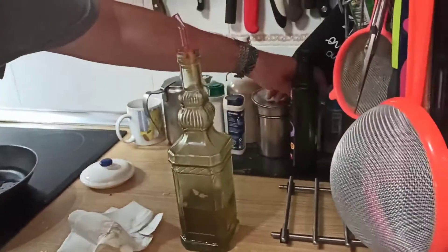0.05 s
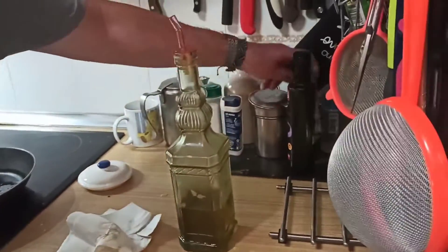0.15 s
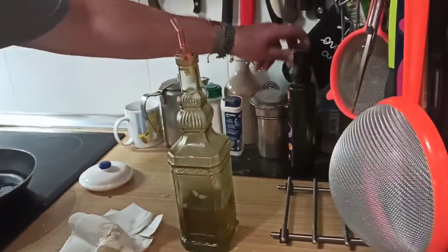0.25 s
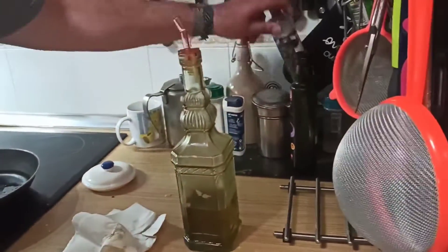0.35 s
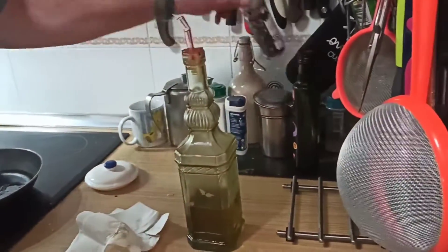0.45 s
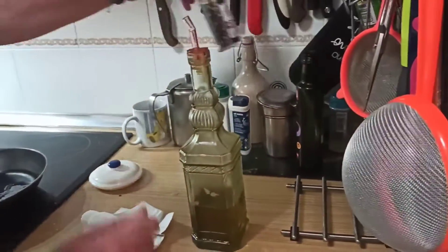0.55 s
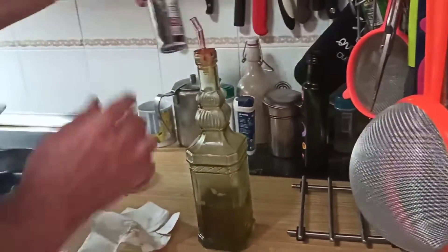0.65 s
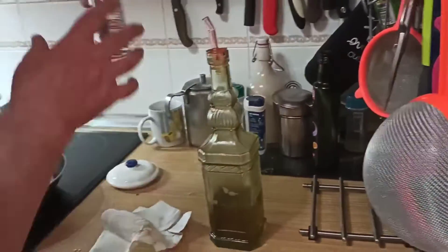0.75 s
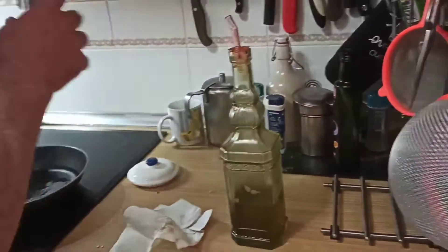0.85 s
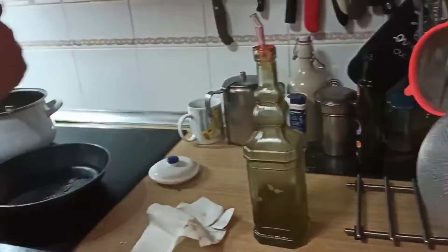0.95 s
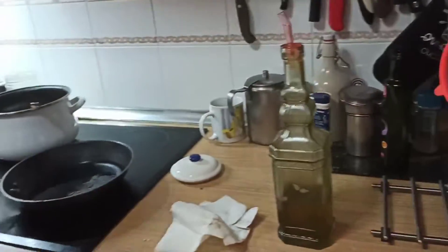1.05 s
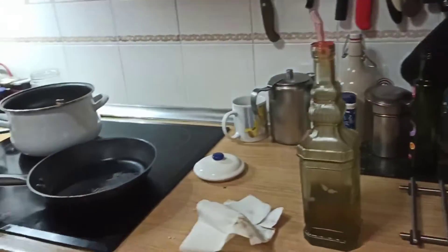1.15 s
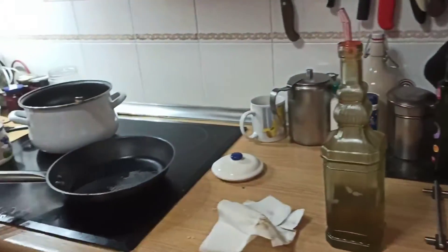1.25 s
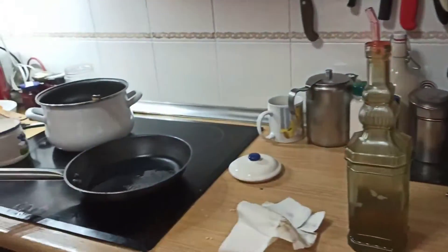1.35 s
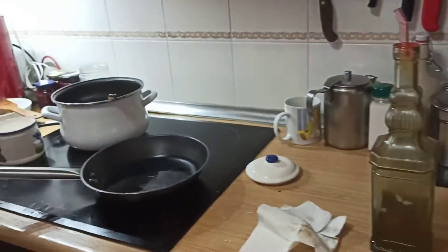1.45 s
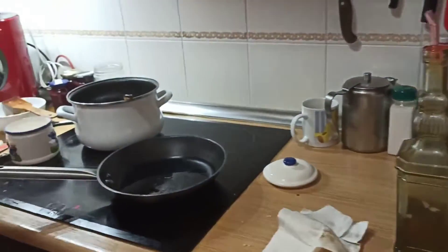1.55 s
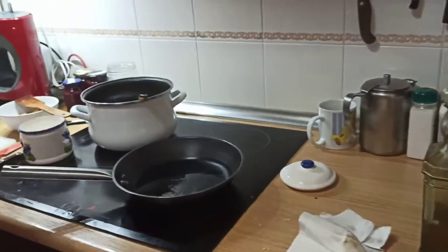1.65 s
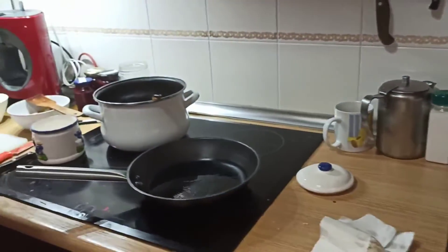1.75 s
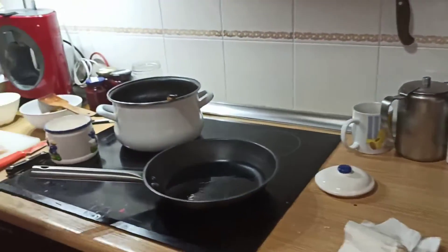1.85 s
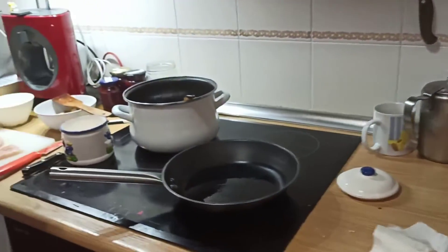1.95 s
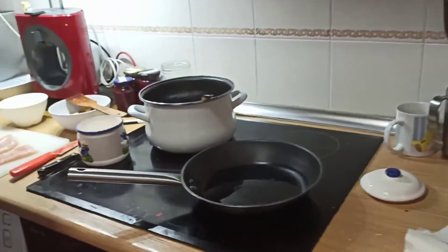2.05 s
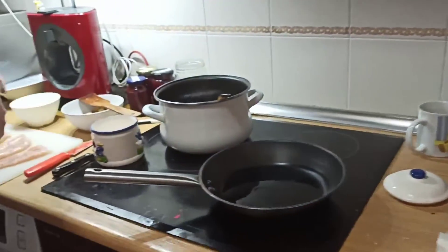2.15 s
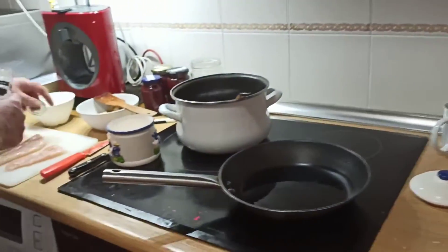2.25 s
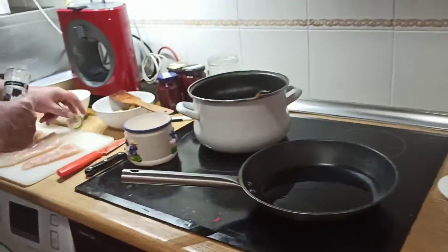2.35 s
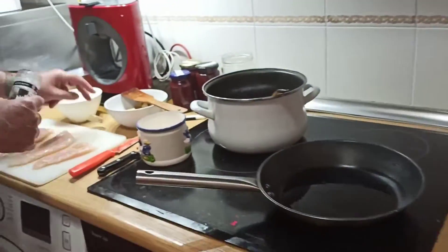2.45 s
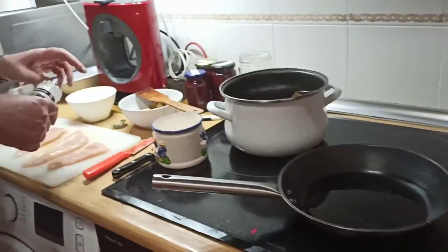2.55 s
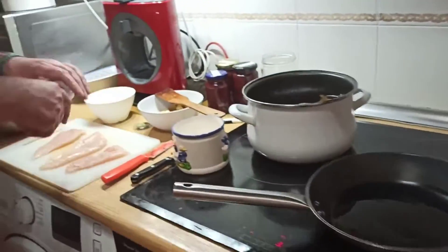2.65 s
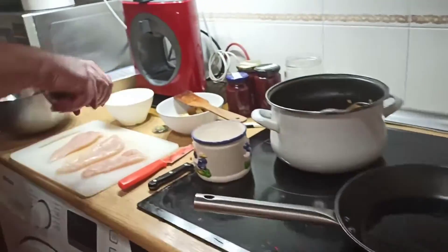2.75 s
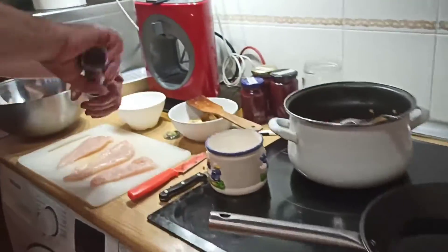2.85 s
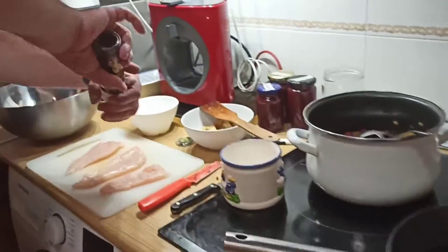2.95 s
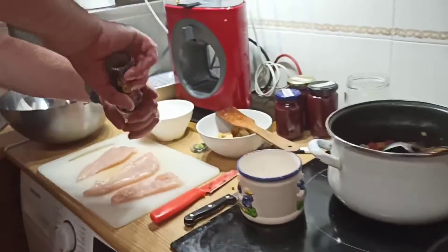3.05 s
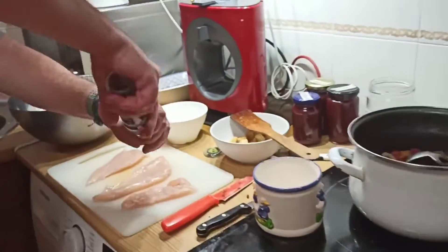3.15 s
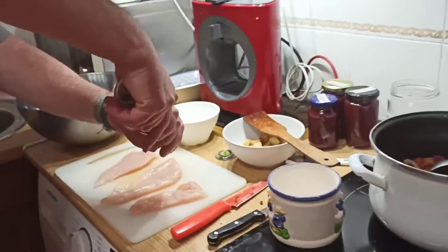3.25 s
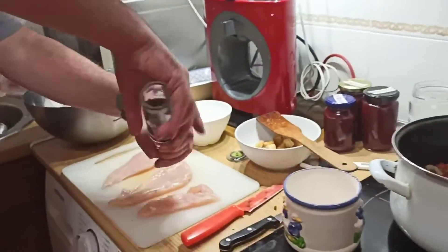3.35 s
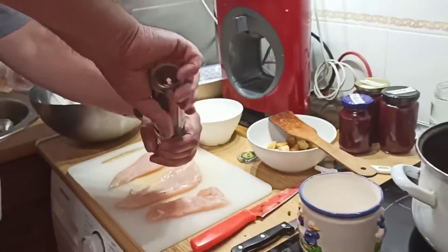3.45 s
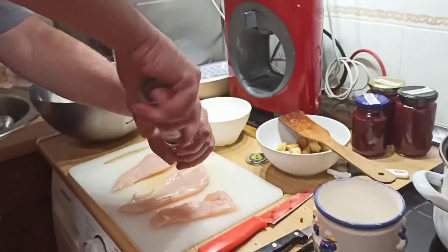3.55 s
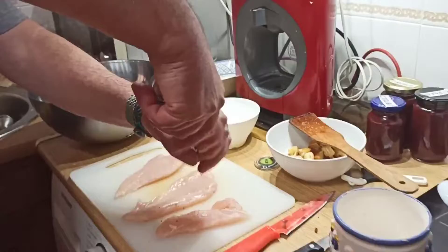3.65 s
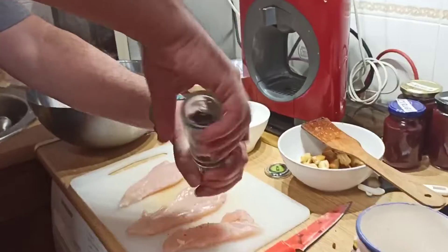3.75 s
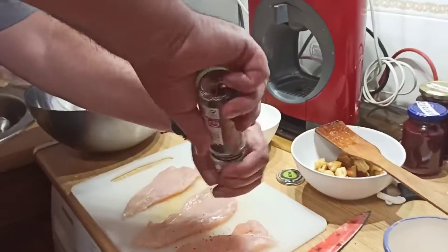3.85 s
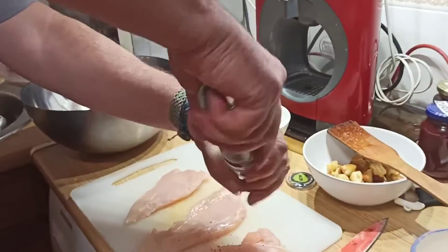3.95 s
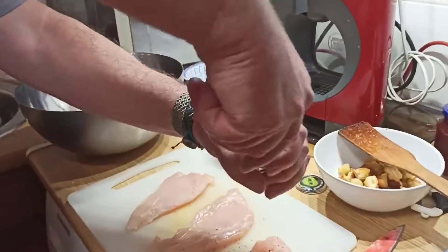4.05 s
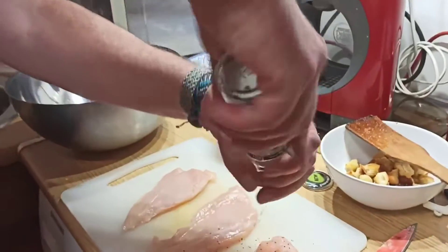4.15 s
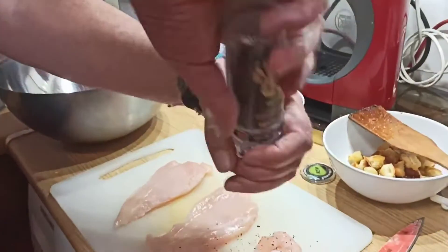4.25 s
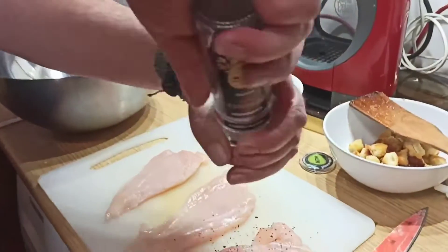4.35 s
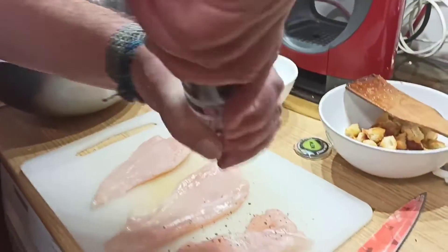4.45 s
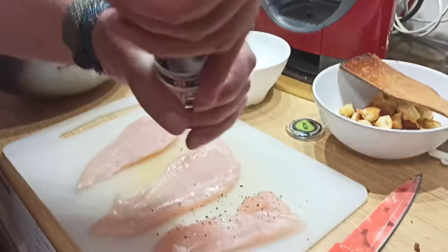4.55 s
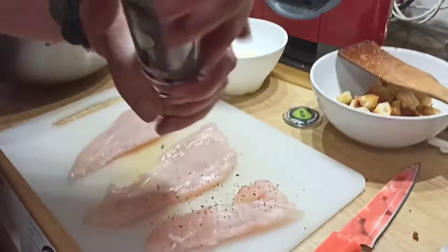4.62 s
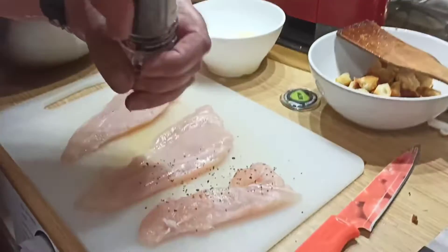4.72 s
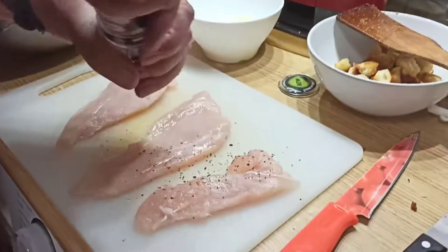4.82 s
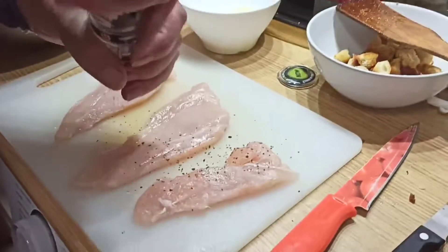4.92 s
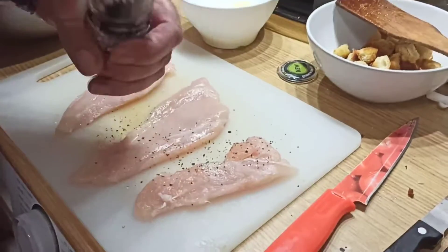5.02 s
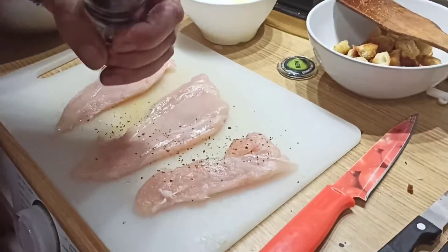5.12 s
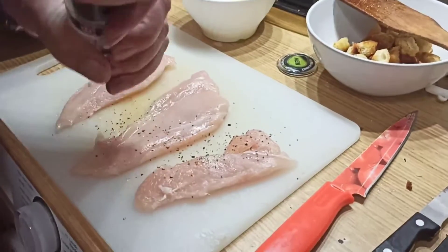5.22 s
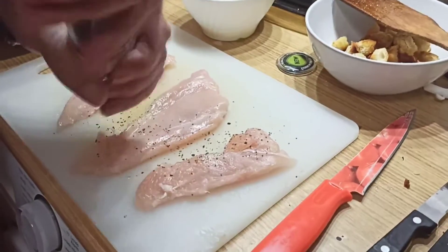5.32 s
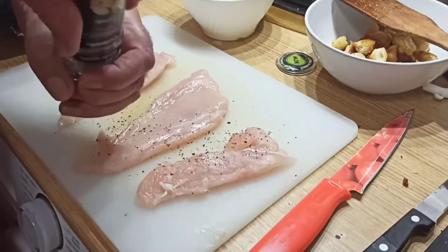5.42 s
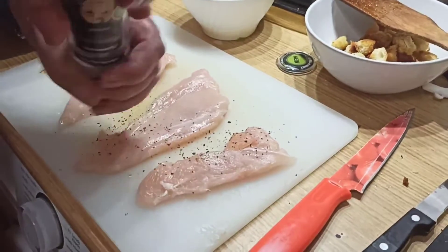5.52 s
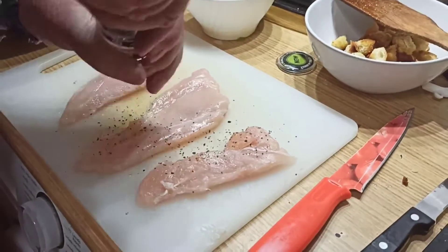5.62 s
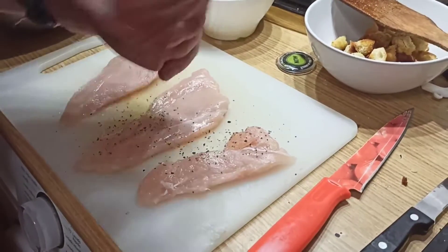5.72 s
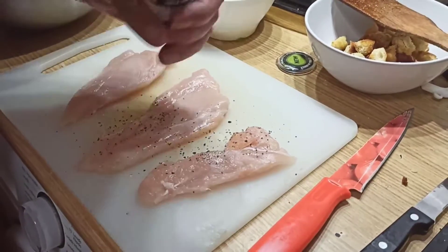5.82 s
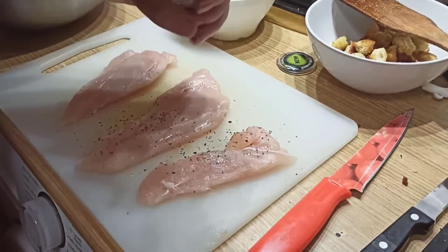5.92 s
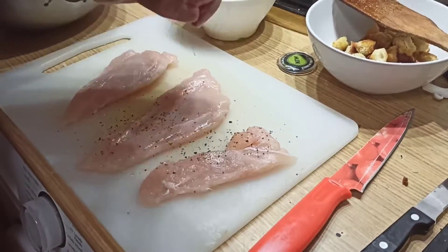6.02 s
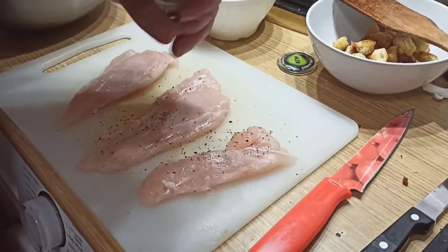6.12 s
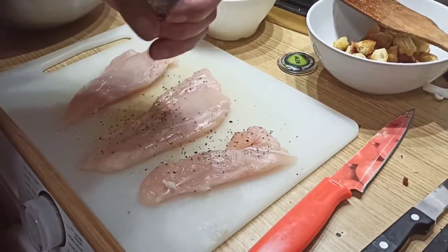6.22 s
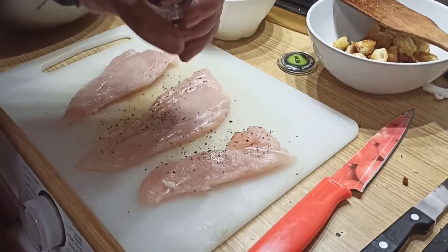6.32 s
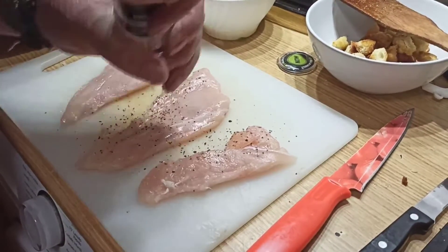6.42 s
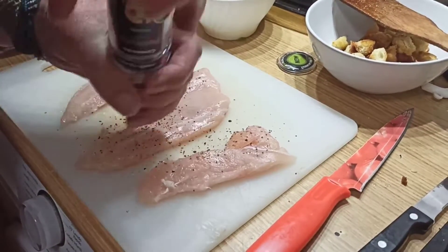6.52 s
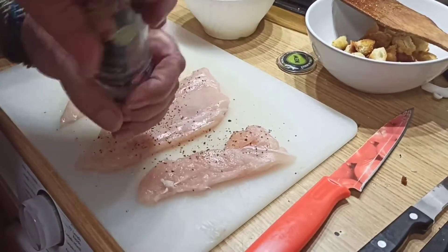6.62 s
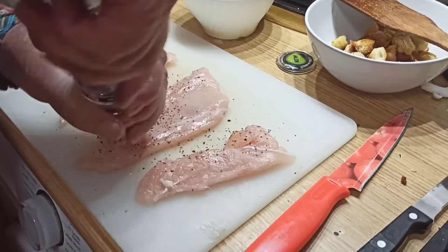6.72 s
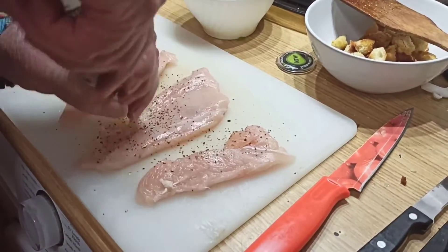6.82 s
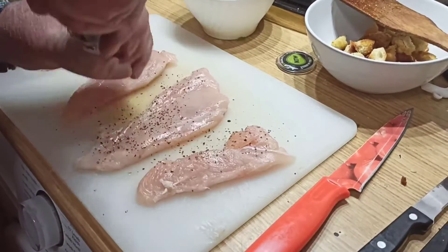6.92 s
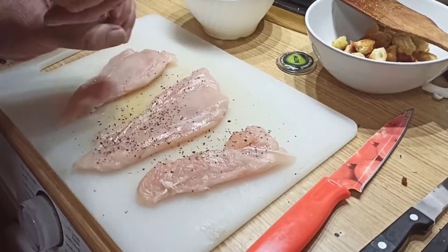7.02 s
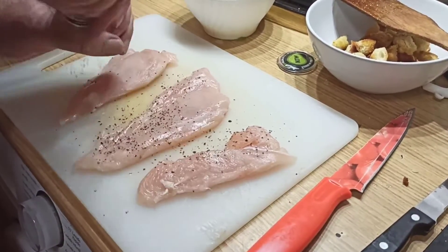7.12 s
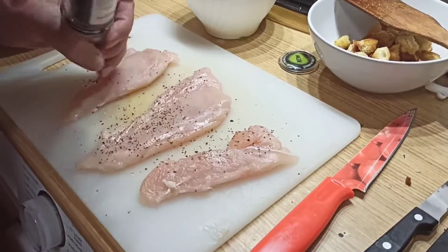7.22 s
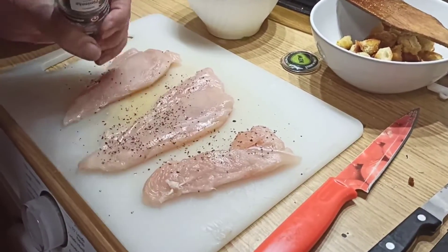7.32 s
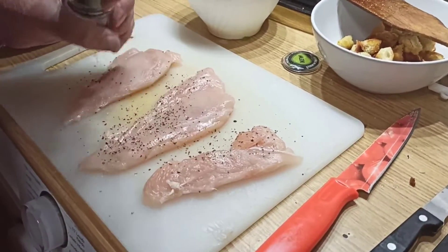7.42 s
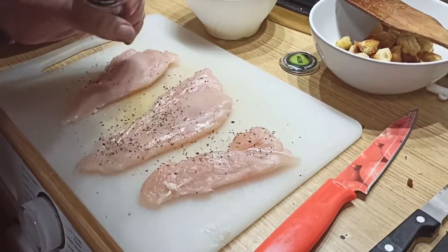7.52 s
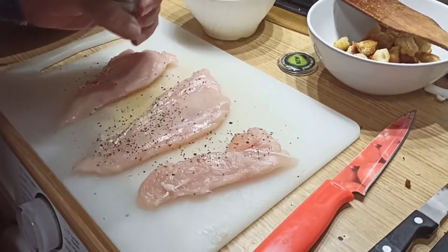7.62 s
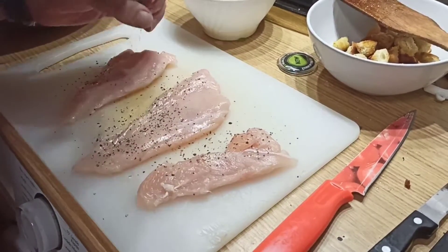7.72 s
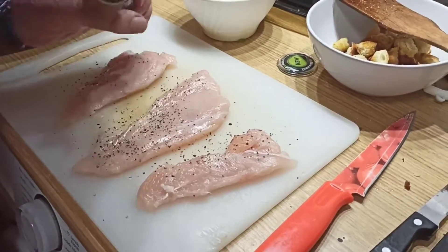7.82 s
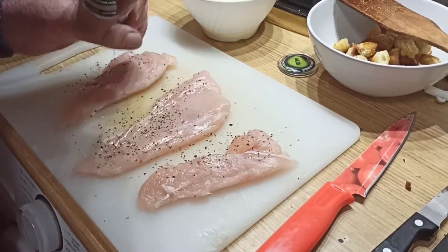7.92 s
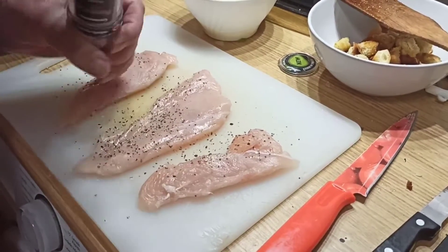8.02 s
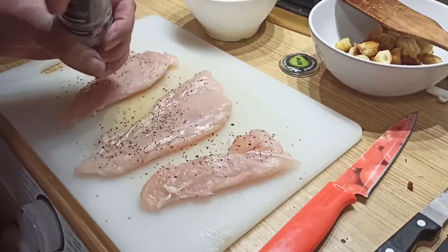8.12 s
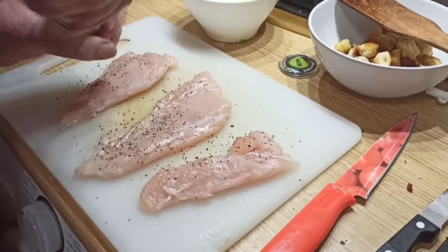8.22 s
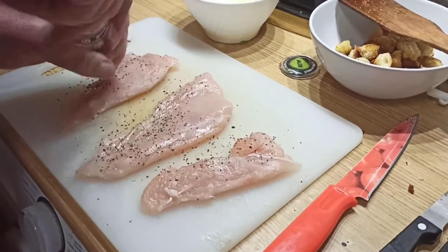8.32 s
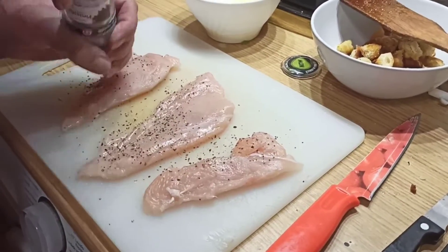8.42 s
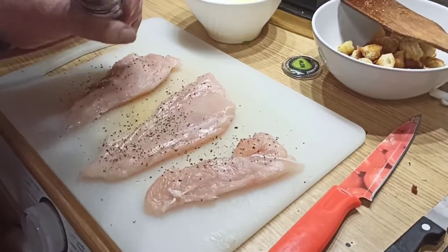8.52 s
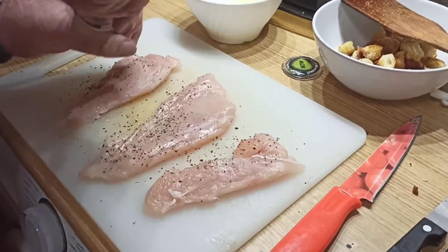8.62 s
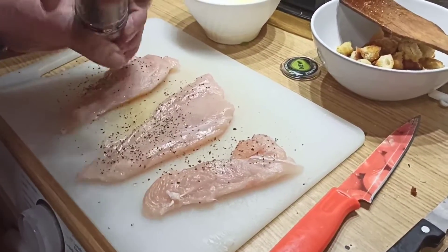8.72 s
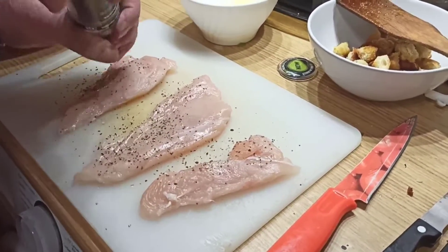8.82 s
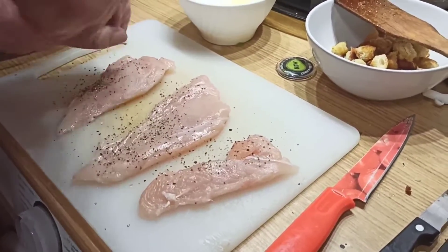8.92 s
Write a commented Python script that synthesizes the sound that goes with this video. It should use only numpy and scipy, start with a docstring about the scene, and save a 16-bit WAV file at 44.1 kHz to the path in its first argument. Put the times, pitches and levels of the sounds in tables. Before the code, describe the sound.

A small tiled kitchen with quiet low room air and a faint motor hum near 100 Hz, slowly beating. From 0 to 2.4 seconds come soft, hollow, woody knocks, irregularly spaced, strongest near 0, 0.25 and 1.85, with dull low thuds, faint rustling and sliding peppercorns. At 2.5 to 2.85 a hard cap is struck in a tight clattering flurry, loudest at 2.7, short and bright. From 3.2 a pepper mill is twisted: a first crunch to 3.4, shorter ones around 3.7 and 4.1, a dense crackle at 4.55, then regular strokes roughly every 0.35 to 0.4 seconds until the end at about 9. Each is a dry tenth-of-a-second crunch of snapping corns, gritty crumbling and high burr rasp, with faint hollow body thrum; weak return rasps fill the gaps. A low thud lands near 7.9. The mill is close, with a short reflective tail.

```python
"""In a small tiled kitchen, over room air and a beating motor hum, a hand pepper mill is fetched.
First come soft hollow knocks, low thuds and a shuffle of handling: short modes and noise grains.
Then its cap is struck and rings as a bank of decaying modes. Then the mill is twisted in quick strokes:
peppercorns crack as noise bursts and crumble as tiny pitched fractures, the burrs rasp as noise grains,
the shell rings, the hollow body thrums as narrow-band noise, and a diffuse tail answers it all."""
import sys
import numpy as np
from scipy import signal
from scipy.fft import rfft, irfft, next_fast_len
from scipy.io import wavfile
from scipy.ndimage import uniform_filter1d

SR = 44100
rng = np.random.default_rng(int(sys.argv[2]) if len(sys.argv) > 2 else 0)


def to_wav(sig):
    """Store sig (one row per channel, or 1-D mono) as 16-bit WAV at the path in sys.argv[1].

    Samples outside -1..1 are clipped; the rate is SR.
    """
    pcm = np.clip(np.atleast_2d(sig), -1, 1) * 32767
    pcm = np.round(pcm).astype(np.int16)
    wavfile.write(sys.argv[1], SR, pcm.T)  # frames by channels


def gain_from_db(level_db):
    """Convert decibel levels to linear amplitude factors (20 dB per decade)."""
    decades = np.asarray(level_db, float) / 20
    return 10 ** decades


N = 395577

# Levels in the tables are relative within a layer; the functions add each layer's own gain.
# Room air, a noise spectrum. Each row: frequency in Hz, density in dB per Hz.
AIR_SPECTRUM = [(30, -39), (60, -6), (100, 3), (200, 1), (400, 0), (700, -5.5), (1200, -15), (3000, -20),
                (6000, -25), (16000, -44)]
# Reverberation of the kitchen. Each row: frequency in Hz, t60 in seconds.
KITCHEN_T60 = [(300, 0.41), (800, 0.28), (2000, 0.38), (5500, 0.32), (15000, 0.17)]
# Handling shuffle, an outline in time. Each row: time in seconds, rustle in dB, sliding corns in dB.
SHUFFLE = [(0.0, -58, -62), (0.08, -80, -75), (0.22, -74, -81), (0.36, -81.5, -82), (0.52, -68, -73),
           (0.7, -77.5, -86), (0.98, -83, -64), (1.18, -64.5, -68), (1.32, -73.5, -68), (1.48, -65.5, -68),
           (1.58, -76, -55), (1.88, -55.5, -48), (2.0, -67, -78), (2.2, -68.5, -67), (2.33, -71, -72),
           (2.41, -59, -48), (2.49, -72, -75), (2.64, -56.5, -58), (2.71, -49, -39), (2.92, -51.5, -62),
           (3.13, -56.5, -41), (3.19, -80, -35)]
# Rustling cloth, a noise spectrum. Each row: frequency in Hz, density in dB per Hz.
CLOTH_SPECTRUM = [(60, -51), (300, -24), (800, 3), (1500, -1.5), (3000, 7.5), (6000, 5.5), (16000, -18)]
# Sliding corns, a noise spectrum. Each row: frequency in Hz, density in dB per Hz.
SLIDE_SPECTRUM = [(2000, -37), (3200, -4), (4300, 6.5), (6600, -2), (9000, -6), (13000, -15), (16000, -8)]
# Soft knocks. Each row: start in seconds, level in dB, hollow pitch in Hz, t60 in seconds,
# clack in dB above that level, clack pitch in Hz.
KNOCKS = [(0.009, -36.5, 413, 0.19, -12.5, 1030), (0.115, -42.5, 344, 0.073, -3, 1050),
          (0.207, -43, 390, 0.09, -1.5, 1010), (0.251, -35, 374, 0.049, -23, 1170),
          (0.42, -49.5, 368, 0.13, -6, 834), (0.498, -55.5, 498, 0.36, 4, 970),
          (0.713, -44, 318, 0.06, -9, 726), (1.149, -42.5, 299, 0.071, -4.5, 770),
          (1.419, -52, 300, 0.064, -6, 2800), (1.647, -44.5, 442, 0.064, -11, 820),
          (1.853, -31, 423, 0.065, -11, 810), (1.899, -41, 327, 0.067, -4.5, 2970),
          (2.046, -52, 508, 0.13, 2.5, 1270), (2.159, -56, 256, 0.046, 14.5, 2680),
          (2.226, -64.5, 453, 0.064, 18.5, 3250), (2.409, -51.5, 360, 0.09, 3, 1100),
          (2.606, -45, 409, 0.1, 13, 1180), (2.941, -54, 450, 0.19, 9.5, 860)]
# Low thuds through the floor. Each row: start in seconds, level in dB.
THUDS = [(0.117, -52), (0.71, -46.5), (0.949, -56), (1.399, -50), (1.851, -45), (2.229, -61), (2.419, -50),
         (2.6, -48.5), (7.877, -40.5)]
# Hard jolts, a short pressure push down to the lowest bass. Each row: start in seconds, level in dB.
JOLTS = [(2.699, -61), (4.553, -56), (5.674, -49), (6.075, -50), (7.11, -56), (7.888, -48)]
# Hits on the cap. Each row: start in seconds, level in dB, gain of the modes below 2 kHz in dB.
CAP_HITS = [(2.5323, -19.5, -14), (2.5997, -22, 0), (2.6942, -17.5, -37), (2.6999, -12.5, -28),
            (2.715, -32, -13), (2.7248, -27, -10), (2.7436, -18.5, -25), (2.7708, -21.5, -16.5),
            (2.788, -23, -35), (2.8144, -25.5, -25), (2.8481, -31, -22), (2.987, -44, -3)]
# Modes of the cap. Each row: frequency in Hz, level in dB, t60 in seconds.
CAP_MODES = [(904, 2, 0.041), (1000, -14, 0.063), (1095, 0, 0.041), (1500, -10, .025), (1705, 3.5, 0.011),
             (2650, -9.5, 0.024), (2830, -8, 0.034), (3055, -2.5, 0.048), (2963, -1, 0.033),
             (3090, -8.5, 0.042), (3240, -31, .08), (4840, -32, 0.073), (6490, -22, 0.044),
             (7950, -31, 0.092)]
# The hand pushes the burrs round, a twist in one to three pushes. Each row: start in seconds,
# length in seconds, crumbling at the start in dB, at the end in dB, burr rasp in dB, body thrum in dB.
PUSHES = [(3.181, 0.025, -45, -40.5, -32.5, -62), (3.258, 0.013, -18, -24, -31, -66),
          (3.283, 0.097, -36, -35, -31.5, -66), (3.684, 0.11, -31, -30.5, -30.5, -60.5),
          (3.862, 0.012, -41, -43, -32.5, -66), (4.029, 0.045, -41, -32.5, -36.5, -61),
          (4.134, 0.021, -30, -28, -25, -46.5), (4.476, 0.033, -51, -39.5, -41.5, -62.5),
          (4.533, 0.095, -24, -34, -29, -62), (4.728, 0.0082, -29, -51, -41, -57),
          (4.893, 0.092, -37, -33.5, -37, -51.5), (5.25, 0.012, -50, -45, -44, -74),
          (5.271, 0.079, -27, -38, -32, -62), (5.672, 0.094, -23, -31.5, -36, -55.5),
          (6.046, 0.01, -46, -48, -45, -81), (6.072, 0.11, -33.5, -28, -34, -53),
          (6.414, 0.011, -53, -40, -44, -68), (6.432, 0.092, -34, -30.5, -30.5, -52),
          (6.774, 0.0093, -54, -36, -46, -64), (6.786, 0.067, -25, -34, -41, -53.5),
          (7.110, .06, -36, -32, -28, -61), (7.479, 0.02, -25.5, -39, -36, -57.5),
          (7.517, 0.059, -25.5, -32, -26.5, -54.5), (7.594, 0.013, -37, -39.5, -28.5, -64),
          (7.853, 0.025, -44, -39, -40, -53.5), (7.895, 0.11, -29.5, -38.5, -29.5, -56),
          (8.093, 0.046, -38.5, -45.5, -45, -68), (8.283, 0.13, -30, -33.5, -31.5, -55.5),
          (8.616, 0.016, -49, -39, -39, -73), (8.636, 0.065, -35, -30, -29.5, -49.5),
          (8.744, 0.041, -46, -50, -59, -66), (8.835, 0.0073, -37, -56, -33.5, -62)]
# The hand turns back and the burrs slide idle. Each row: loudest moment in seconds, rasp in dB.
RETURNS = [(3.605, -44.5), (3.959, -41), (4.399, -46), (4.46, -47), (4.86, -42.5), (5.215, -41.5),
           (5.55, -50.5), (5.64, -49), (6.004, -43), (6.345, -45), (6.398, -39), (6.717, -41), (7.05, -67),
           (7.411, -42.5), (7.80, -43), (8.23, -43), (8.60, -48), (8.96, -46.5)]
# The loudest peppercorns cracking. Each row: start in seconds, snap in dB,
# then dull part, sharp part and brightest part, each in dB above the snap.
CRACKS = [(3.1966, -32, -24, 6, -7), (3.2554, -16, -21, 4, -6), (3.2678, -20.5, -5, -10, -6.5),
          (3.2918, -11.5, -6, -15, -5.5), (3.3254, -33, -15, 2, -9), (3.3417, -19.5, -20, -1, 5),
          (3.3716, -23, -4.5, -13, -23), (3.678, -26.5, -6.5, -15, -15), (3.725, -20, -15, 7, -8),
          (3.7416, -18, -21, -9, -20), (3.7469, -17, -15, -12, -21), (3.7884, -28, -19, -5, -12),
          (3.8617, -28, -32, 12, 0), (4.0712, -21, -8, 9, -19), (4.0756, -24, -12, 11, -9),
          (4.1317, -14.5, -3, -1, -2), (4.139, -14, -12, 5, -13), (4.4877, -38, -18, -2, -4),
          (4.4974, -36, -6, 4, -5), (4.5064, -28.5, -8, 7.5, -1), (4.5315, -18.5, -16, -4, -10),
          (4.5397, -23, -16, 5, 0), (4.5531, -11, -12, 3, -11), (4.566, -14, -11, -11, -15),
          (4.5782, -12.5, -11, -8, -12), (4.597, -16, -10, -6, -16), (4.6149, -12.5, -12, -15, -28),
          (4.6248, -23, -9, -4, -14), (4.637, -20, -14, -3, -17), (4.7335, -26.5, -1.5, 11.5, -7),
          (4.8949, -32, -17, 20, -25), (4.9077, -25, -10, -1, -9), (4.9322, -18.5, -9, 8.5, -5),
          (4.9801, -24, 4.5, 2, -16), (4.9883, -22, -2, 13, -8), (5.003, -14.5, -27, 1, -7),
          (5.2733, -20.5, -10, 16, -11), (5.293, -15.5, -31, 4, -13), (5.3183, -15.5, -12, 7, -9),
          (5.3329, -23, -15, 0, -15), (5.3638, -19, -14, 5.5, -12), (5.669, -13.5, -26, -8, -14),
          (5.6744, -29, -23, -10, -17), (5.691, -11, -16, -7, -16), (5.7227, -12, -7, -15, -9),
          (5.7557, -15, -16, -9, -12), (6.0416, -34, -16, 8, -10), (6.0755, -9.5, -40, -22, -29),
          (6.105, -12.5, -13, -8, -10), (6.1318, -14.5, -16, -13, -18), (6.1702, -12.5, -17, -6, -14),
          (6.2468, -29, -17, -5, -21), (6.43, -34, -16, -9, 7), (6.447, -19, -5, -5, -6),
          (6.4743, -11.5, -9, 6, -3), (6.4945, -10.5, -19, -12, -17), (6.5016, -16, -10, -8, -12),
          (6.534, -17, -9, -9, -19), (6.5567, -17, -19, 1, -24), (6.7903, -15.5, -13, -9, -12),
          (6.8042, -13, -23, -10, -5), (6.822, -19, -29, -12, -12), (6.8385, -14, -8, -11, -18),
          (6.846, -26, -11, -2, -11), (7.1109, -15, -18, 4.5, -4.5), (7.1274, -17, -22, -4, -7),
          (7.4768, -10.5, -10.5, -6, -8), (7.5186, -20, -18, 6, -4), (7.5606, -12, -22, -12, -20),
          (7.5734, -32, -23, -2, -17), (7.5981, -18, -12, 12, -18), (7.8658, -34, 3, 15, -6),
          (7.8967, -14.5, -16, -15, -43), (7.9138, -14, -24, -5, -9), (7.9208, -17.5, -14, 11, -21),
          (7.9338, -21, -1, 0, -9), (7.9678, -11.5, -12.5, -3, -29), (7.9941, -20.5, -6.5, 10, -4.5),
          (8.0279, -24, -16, -6, -25), (8.101, -23.5, -8, -11, -25), (8.126, -24, -11, -12, -14),
          (8.2744, -26, -29, -1, -14), (8.2894, -16, -15, 10.5, -8), (8.303, -13, -8, 7, -10.5),
          (8.3338, -18, -9, -2, -10), (8.3514, -11, -16, -18, -17), (8.3627, -18, -4, 1, -7),
          (8.3924, -20.5, -3, 7, -9), (8.6358, -24.5, -24, -8, -21), (8.6502, -32, -6, 21, -4),
          (8.6729, -11, -14, 1, -20), (8.6987, -12.5, -10.5, -10, -27), (8.7661, -29, -2, -6, -20),
          (8.8354, -26.5, -33, 1, -9)]
# Resonances of the mill's shell. Each row: frequency in Hz, level in dB, t60 in seconds.
SHELL_MODES = [(1853, -15, 0.065), (2340, -39, 0.025), (2750, -7.5, 0.062), (3830, -5, 0.02),
               (4496, 0, 0.02), (6580, -3, 0.032), (7670, -1, 0.024)]
# Crumbling corns, a noise spectrum. Each row: frequency in Hz, density in dB per Hz.
CRUMBLE_SPECTRUM = [(400, -48.5), (700, -32.5), (1300, -23), (1900, -10.5), (3000, -5.5), (4500, 0),
                    (7000, -6), (11000, -7), (16000, -29)]
# Rasping burrs, a noise spectrum. Each row: frequency in Hz, density in dB per Hz.
RASP_SPECTRUM = [(4000, -54.5), (5500, -8), (6600, 9.5), (7600, 0.5), (9000, -19), (13000, -14.5),
                 (16000, -7.5)]
# Treble weighting, edges between its bands. Each entry: frequency in Hz.
STEP_EDGES_HZ = [4750, 6120, 6870, 7650, 8520, 11600, 15850]
# Treble weighting, below, between and above those edges. Each entry: gain in dB.
STEP_GAINS_DB = [0.5, -4.5, 4, 8, 3, -14.5, 7.5, -38]

HUM_HZ, HUM_DB, SECOND_MOTOR_DB = 99.3, -64, -0.5     # mean pitch, first motor, second relative to it
BEAT_S, FAINTEST_AT_S = 0.652, 4.51                   # period of the beat, one of its minima
THUD_HZ = 139
GRIP_S = 0.007                                # a push climbs its last 30 dB in this time
STOP_DB_PER_S = 902                           # and stops this steeply
TRICKLE_DB, TRICKLE_DB_PER_S = -21.5, 47      # crumbs trickle on after it: relative level, fall
CATCH_DB, CATCH_HZ = 3.5, 11.5                # the burrs catch and slip: rms depth, corner frequency
RETURN_RISE_DB_PER_S, RETURN_FALL_DB_PER_S = 208, 175
SMALL_CRACKS_PER_S, SMALL_CRACK_DB = 60, 0.5  # mean rate, offset from the crumbling before layer gains
SNAP_T60_S, SNAP_RISE_S = 0.0045, 0.0003
SHARDS_BELOW_DB, SHARDS_T60_S = 10, 0.036     # a cracked corn falls apart for a moment


def rms_one(x):
    """Normalisation by mean power: the result has rms 1."""
    return x / np.sqrt(np.mean(x ** 2) + 1e-20)


def in_time(rows):
    """Linear interpolation: each column becomes a value per sample."""
    s, *columns = np.transpose(rows)
    return [np.interp(np.arange(N) / SR, s, column) for column in columns]


def at_hz(points, hz):
    """Interpolation on a logarithmic frequency axis."""
    table_hz, values = np.transpose(points)
    return np.interp(np.log(np.maximum(hz, 1)), np.log(table_hz), values)


def coloured(x, spectrum):
    """Minimum-phase filtering: nothing sounds before a click, and white noise keeps its rms."""
    cepstrum = irfft(np.log(gain_from_db(at_hz(spectrum, np.linspace(0, SR / 2, 1025)))))
    cepstrum[1:1024] *= 2      # folding the cepstrum onto positive time gives minimum phase
    cepstrum[1025:] = 0
    response = irfft(np.exp(rfft(cepstrum)))
    return signal.fftconvolve(x, response / np.sqrt(np.sum(response ** 2)))[:N]


def band(x, low_hz, high_hz):
    """Butterworth band-pass filtering."""
    return signal.sosfilt(signal.butter(2, [low_hz, high_hz], "band", fs=SR, output="sos"), x)


def drift(corner_hz):
    """Low-passed Gaussian noise: a slow random fluctuation of rms 1."""
    r = np.exp(-2 * np.pi * corner_hz / SR)
    noise = rng.standard_normal(N + SR)
    return rms_one(signal.lfilter([1], [1, -2 * r, r * r], noise)[SR:])


def ring(clicks, hz, t60):
    """Impulse response of a damped resonator: a unit click starts a decaying sine of height 1."""
    r, w = gain_from_db(-60 / (t60 * SR)), 2 * np.pi * hz / SR
    return signal.lfilter([0, np.sin(w)], [1, -2 * r * np.cos(w), r * r], clicks + 1e-18)


def clicks_at(times, levels_db):
    """Impulsive excitation: one single-sample click per event."""
    clicks = np.zeros(N)
    np.add.at(clicks, np.round(np.asarray(times) * SR).astype(int), gain_from_db(levels_db))
    return clicks


def bursts(clicks, t60, rise_s=0.00021):
    """Noise under an exponential envelope: each click lets out a puff that swells fast and dies away."""
    dying = signal.lfilter([1], [1, -gain_from_db(-60 / (t60 * SR))], np.abs(clicks) + 1e-18)
    r = np.exp(-1 / (rise_s * SR))
    return signal.lfilter([1 - r], [1, -r], dying) * rng.choice([-1, 1], N)


def grains(per_s, spread_db, t60):
    """Random point process: tiny fractures of very uneven size at a wavering rate; rms 1."""
    sizes = gain_from_db(spread_db * np.minimum(rng.exponential(1, N), 5))
    born = rng.random(N) < per_s * gain_from_db(3.0 * drift(25)) / SR
    return rms_one(bursts(sizes * born, t60))


def crumbs(per_s, spread_db, cycles):
    """Damped ringing: each tiny fracture sounds at a randomly dealt pitch, higher ones die sooner; rms 1."""
    sizes = gain_from_db(spread_db * np.minimum(rng.exponential(1, N), 3.5)) * rng.choice([-1, 1], N)
    born = rng.random(N) < per_s * gain_from_db(3.0 * drift(30)) / SR
    pitches = np.geomspace(500, 15000, num=20)
    dealt = rng.integers(0, 20, N)     # which pitch a fracture gets
    return rms_one(sum(ring(sizes * born * (dealt == k), hz, cycles / hz) for k, hz in enumerate(pitches)))


def background():
    """Interference of two tones: motors almost in tune make a beating hum, over faintly wavering air."""
    t = np.arange(N) / SR
    beat = np.pi * (t - FAINTEST_AT_S) / BEAT_S
    first = np.sin(2 * np.pi * HUM_HZ * t + beat)
    second = gain_from_db(SECOND_MOTOR_DB) * np.sin(2 * np.pi * HUM_HZ * t - beat)
    hum = gain_from_db(HUM_DB + 2.9 * drift(3.3)) * (first - second)
    air = gain_from_db(-60.5 + 0.13 * drift(5.6)) * coloured(rng.standard_normal(N), AIR_SPECTRUM)
    third_harmonic = gain_from_db(-74.0 + 3.0 * drift(1.5)) * np.sin(2 * np.pi * 150 * t)     # of the mains
    return air + third_harmonic + hum


def kitchen(x):
    """Diffuse reverberation: octave bands of noise die at their own rates.

    Twisting hands move the mill, so from the first twist on its echoes keep changing."""
    t, out, places = np.arange(SR // 2) / SR, 0, 8
    twisting_s = np.maximum(np.arange(N) / SR - PUSHES[0][0], 0)
    where = np.floor(twisting_s / 0.02 % places)     # the next place every 20 ms
    for place in range(places):
        tail = 0
        for low_hz in 125 * 2. ** np.arange(7):
            noise = band(rng.standard_normal(len(t)), low_hz, 2 * low_hz)
            tail = tail + noise * gain_from_db(-60 * t / at_hz(KITCHEN_T60, low_hz * np.sqrt(2)))
        tail *= np.clip((t - 0.003) / 0.0009, 0, 1)     # silent for the first 3 ms
        tail /= np.sqrt(np.sum(tail ** 2))
        out = out + signal.oaconvolve(x * (where == place), tail)[:N]
    return out


def shuffle():
    """Friction as a stream of grains: hands and cloth rustle, loose corns slide as the mill is fetched."""
    rustle_db, slide_db = in_time(SHUFFLE)
    fetching = np.arange(N) < SHUFFLE[-1][0] * SR
    rustle = gain_from_db(rustle_db + 2.0) * coloured(grains(2600, 3.3, 0.0078), CLOTH_SPECTRUM)
    slide = gain_from_db(slide_db - 15.5) * coloured(grains(3000, 2.5, 0.01), SLIDE_SPECTRUM)
    return fetching * (rustle + slide)


def knocks():
    """Impact on hollow things at the counter: a low mode, a drier high clack and a scuff."""
    out, rough = np.zeros(N), rng.standard_normal(N)
    t = np.arange(SR // 4) / SR
    for s, db, hz, t60, clack_db, clack_hz in KNOCKS:
        start = round(s * SR)
        span = slice(start, start + len(t))
        contact = rough[span] * gain_from_db(-60 * t / 0.051)     # an uneven, dying contact
        clack = gain_from_db(clack_db + 15.5) * band(contact, 0.92 * clack_hz, 1.21 * clack_hz)
        hollow = np.sin(2 * np.pi * hz * t) + 6.5 * band(rough[span], 0.65 * hz, 1.15 * hz)
        out[span] += gain_from_db(db) * (hollow * gain_from_db(-60 * t / t60) + clack)
    s, level_db, _, _, clack_db, _ = np.transpose(KNOCKS)
    scuff = bursts(clicks_at(s, level_db + clack_db + 8.0), 0.041, 0.0048)
    return band(out, 130, 8500) + band(scuff, 270, 3600)


def thuds():
    """Low-frequency impact: band-limited noise swells and fades, and jolts push down to the lowest bass."""
    out = np.zeros(N)
    for s, db in THUDS:
        thud = band(bursts(clicks_at([s], [db + 22.0]), 0.14, 0.0088), 0.5 * THUD_HZ, 1.8 * THUD_HZ)
        out += band(thud, 70, 600)
    s, jolt_db = np.transpose(JOLTS)
    return out + band(clicks_at(s, jolt_db + 47.0), 14.8, 200)


def cap():
    """Modal excitation: every hit strikes all modes anew and a rough contact feeds them for a moment."""
    s, level_db, low_db = np.transpose(CAP_HITS)
    chance, modes = rng.normal(0, 1.65, (len(s), len(CAP_MODES))), 0     # dB per hit and mode
    for k, (hz, mode_db, t60) in enumerate(CAP_MODES):
        blow = clicks_at(s, level_db + mode_db + low_db * (hz < 2000) + chance[:, k])
        modes = modes + ring(gain_from_db(-13.0) * blow + gain_from_db(-25.5) * bursts(blow, 0.053), hz, t60)
    rattle = coloured(bursts(clicks_at(s, level_db - 22.0), 0.034, 0.0023), CLOTH_SPECTRUM)
    contact = coloured(bursts(clicks_at(s, level_db - 11.0), 0.0074), CLOTH_SPECTRUM)
    return band(modes, 450, 12000) + rattle + contact


def push_level(start_db, end_db):
    """Envelope of driven motion in dB: a push grips, holds, stops short, trickles out; the loudest counts."""
    t, level = np.arange(N) / SR, np.full(N, -120.)
    for (s, length, *_), first, last in zip(PUSHES, start_db, end_db):
        span = slice(int((s - 0.05) * SR), int((s + 1) * SR))
        since, after = t[span] - s, np.maximum(t[span] - s - length, 0)
        held = first + (last - first) * np.clip(since / length, 0, 1)
        grip = np.minimum(since, 0) * 30 / GRIP_S
        tail = np.maximum(-STOP_DB_PER_S * after, TRICKLE_DB - TRICKLE_DB_PER_S * after)
        level[span] = np.maximum(level[span], held + grip + tail)
    return level


def return_level():
    """Envelope of idle sliding in dB: the rasp swells to each turning point and fades."""
    t = np.arange(N) / SR
    slopes = [db + np.minimum(RETURN_RISE_DB_PER_S * (t - s), RETURN_FALL_DB_PER_S * (s - t))
              for s, db in RETURNS]
    return np.max(slopes, axis=0)


def cracks(crumble_db):
    """Brittle fracture: corns snap in four bands, fall into shards and set the shell's modes ringing."""
    s, snap_db, dull_db, sharp_db, bright_db = np.transpose(CRACKS)
    # lesser cracks come at random and follow the crumbling in level
    small_db = crumble_db + SMALL_CRACK_DB + 2.6 * rng.standard_normal(N)
    small = (rng.random(N) < SMALL_CRACKS_PER_S / SR) * gain_from_db(small_db)
    snap_clicks = gain_from_db(5.5) * (clicks_at(s, snap_db) + small)
    dull_clicks = clicks_at(s, snap_db + dull_db + 12.5) + gain_from_db(-3.0) * small
    sharp_clicks = clicks_at(s, snap_db + sharp_db + 3.0) + gain_from_db(4.0) * small
    bright_clicks = clicks_at(s, snap_db + bright_db + 4.5) + gain_from_db(-8.5) * small
    snap = band(bursts(snap_clicks, SNAP_T60_S, SNAP_RISE_S), 2900, 5140)
    dull = band(bursts(dull_clicks, 0.0056, 0.0012), 1210, 4600)
    sharp = band(bursts(sharp_clicks, 0.0041, 0.00042), 6000, 8670)
    bright = band(bursts(bright_clicks, 0.0077, 0.00044), 11400, 14300)
    falling = bursts(clicks_at(s, snap_db - SHARDS_BELOW_DB), SHARDS_T60_S, 0.0011)
    shards = coloured(falling * np.abs(crumbs(3000, 2.75, 5.7)), CRUMBLE_SPECTRUM)
    # each listed crack excites the shell's modes in randomly varied strengths
    chance = 6.2 * rng.standard_normal((len(s), len(SHELL_MODES)))
    shell = sum(ring(clicks_at(s, snap_db + db - 15.5 + chance[:, k]), hz, t60)
                for k, (hz, db, t60) in enumerate(SHELL_MODES))
    return snap + dull + sharp + bright + shards + band(shell, 980, 14600)


def mill():
    """Stick-slip and fracture driven by the hand: crumbling, rasp and thrum follow it, cracks stand out."""
    _, _, first_db, last_db, rasp_db, thrum_db = np.transpose(PUSHES)
    catch_db = CATCH_DB * drift(CATCH_HZ)
    crumble_db = push_level(first_db, last_db) + catch_db
    crumble = gain_from_db(crumble_db - 2.0) * rms_one(coloured(crumbs(3500, 3.7, 12.0), CRUMBLE_SPECTRUM))
    burr_db = np.maximum(push_level(rasp_db, rasp_db) + catch_db, return_level())
    rasp = gain_from_db(burr_db - 9.0) * coloured(grains(2500, 3.8, 0.0066), RASP_SPECTRUM)
    body_air = rms_one(band(rng.standard_normal(N), 289, 389))     # air in the hollow body
    thrum = gain_from_db(push_level(thrum_db, thrum_db) + 3.9 * drift(19.6)) * body_air
    return crumble + rasp + thrum + cracks(crumble_db)


def scene():
    """Superposition of the near sources, their echo in the kitchen and the background."""
    near = shuffle() + knocks() + thuds() + cap() + mill()
    return (near + gain_from_db(-7.5) * kitchen(near) + background())[None]


def roll_off(x):
    """The treble ends steeply here."""
    return signal.sosfilt(signal.butter(12, 16800, fs=SR, output="sos"), x)


def record(dry):
    """Linear filtering in the frequency domain: the treble is weighted in steep steps."""
    size = next_fast_len(N)
    step = np.searchsorted(STEP_EDGES_HZ, np.arange(size // 2 + 1) * SR / size)
    gain_db = uniform_filter1d(np.array(STEP_GAINS_DB, float)[step], size=600)     # softens the edges
    mix = irfft(rfft(dry, size) * gain_from_db(gain_db), size)[:, :N]
    return roll_off(mix)


dry = scene()
out = record(dry)
to_wav(out)
```